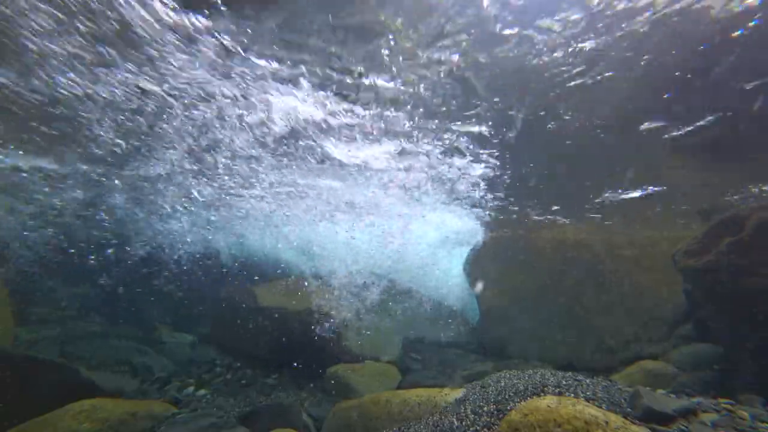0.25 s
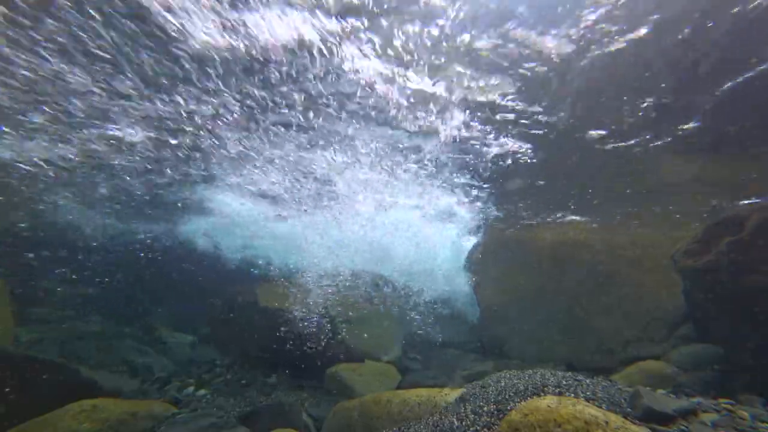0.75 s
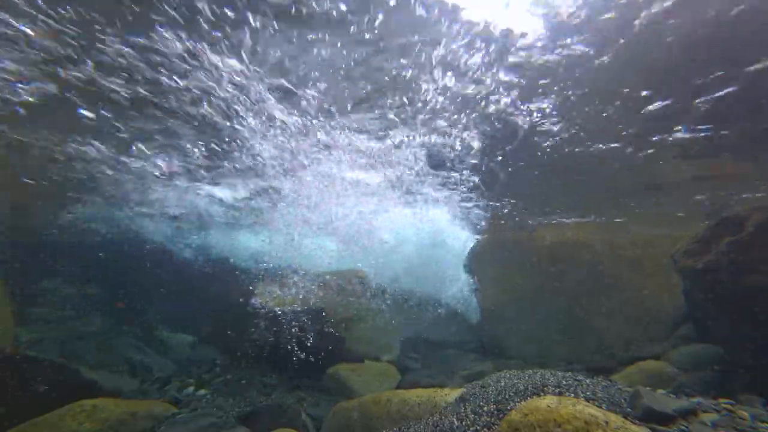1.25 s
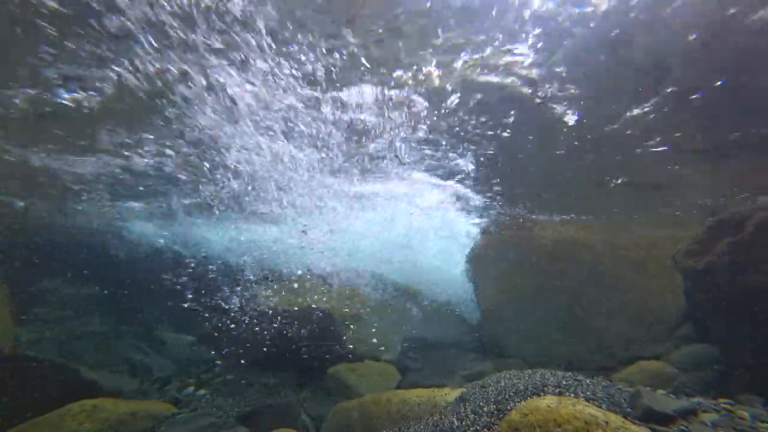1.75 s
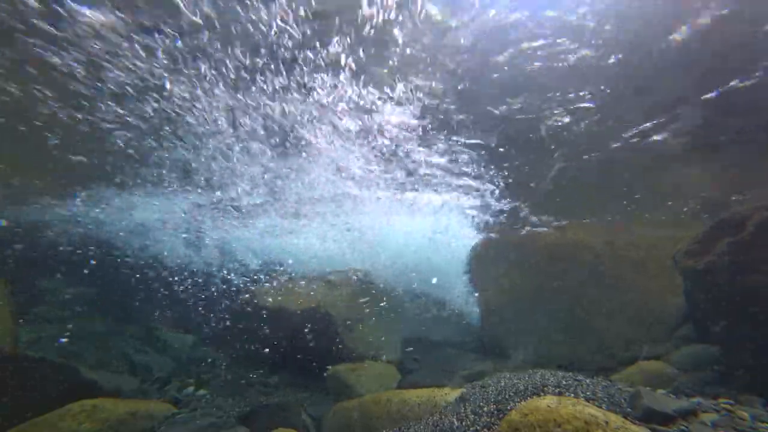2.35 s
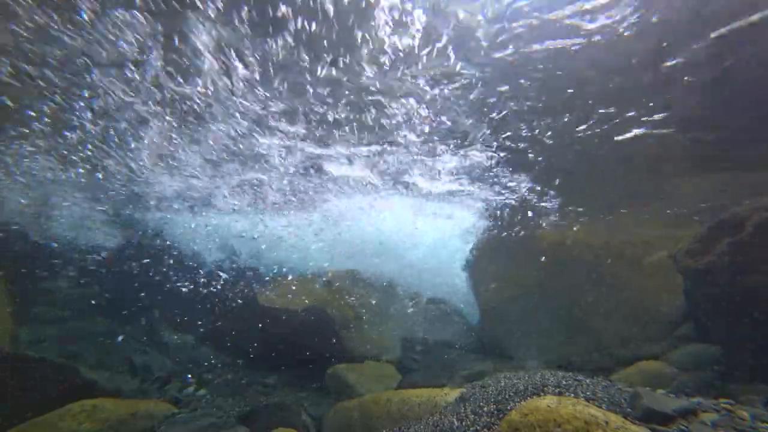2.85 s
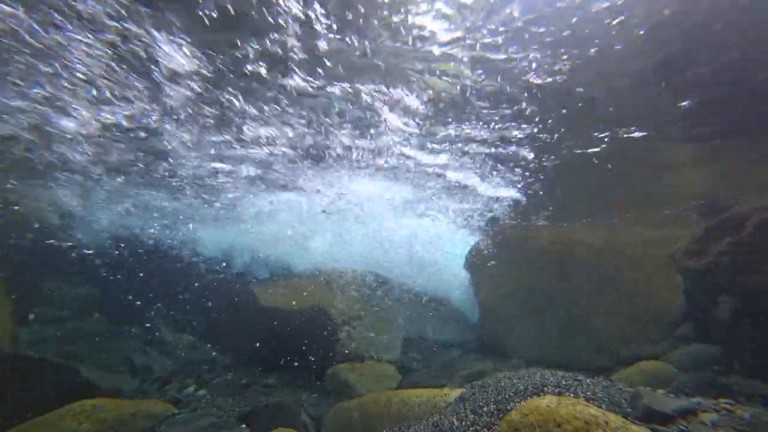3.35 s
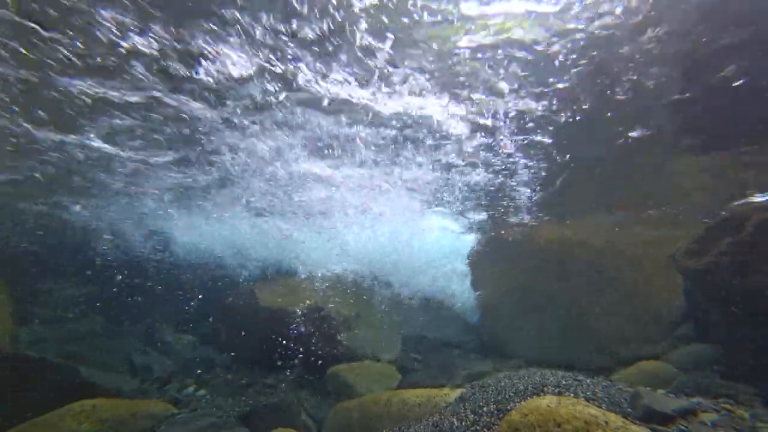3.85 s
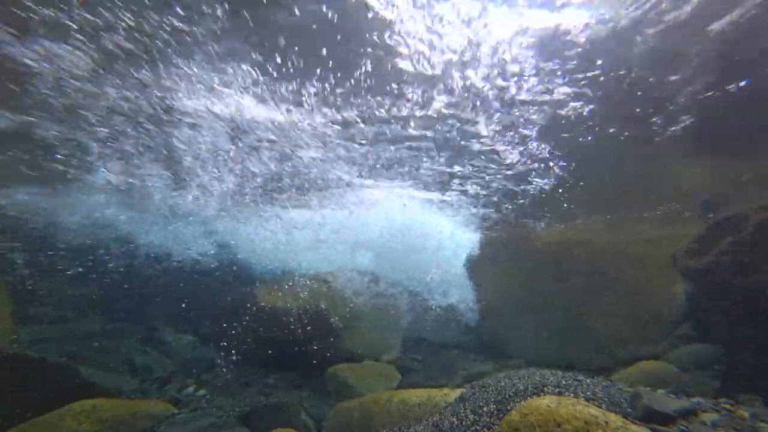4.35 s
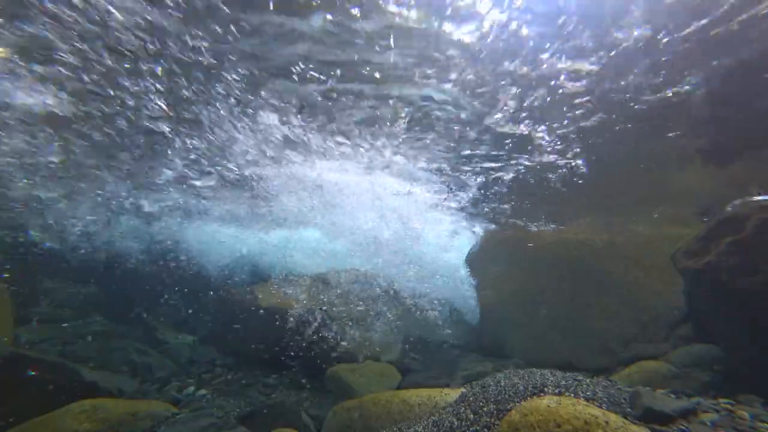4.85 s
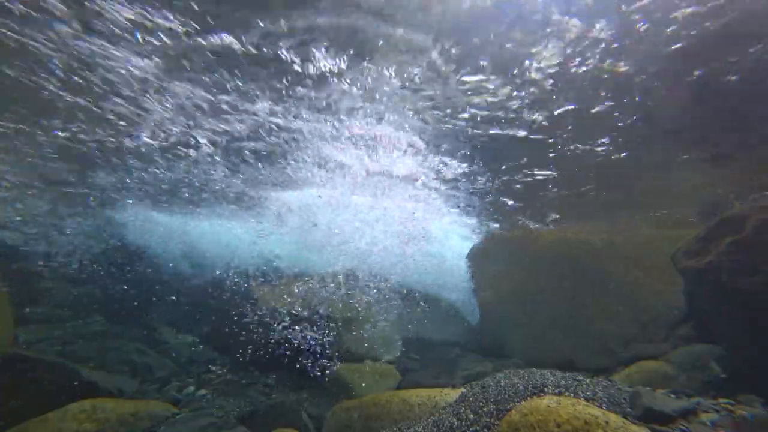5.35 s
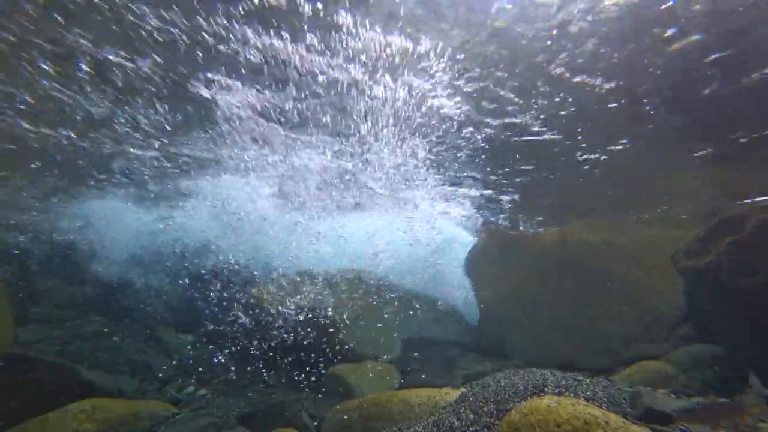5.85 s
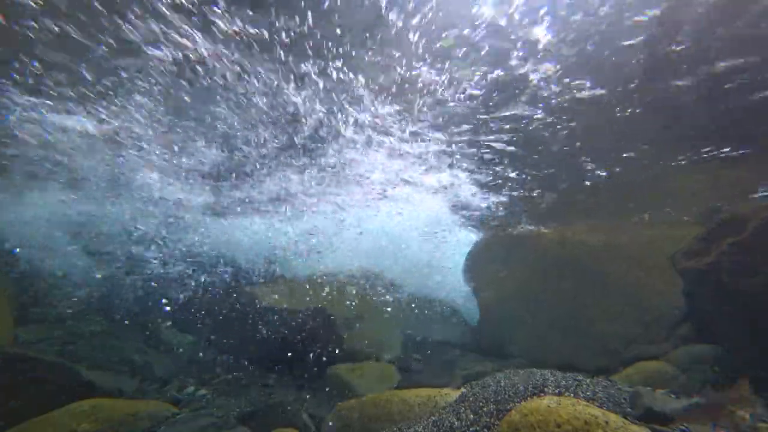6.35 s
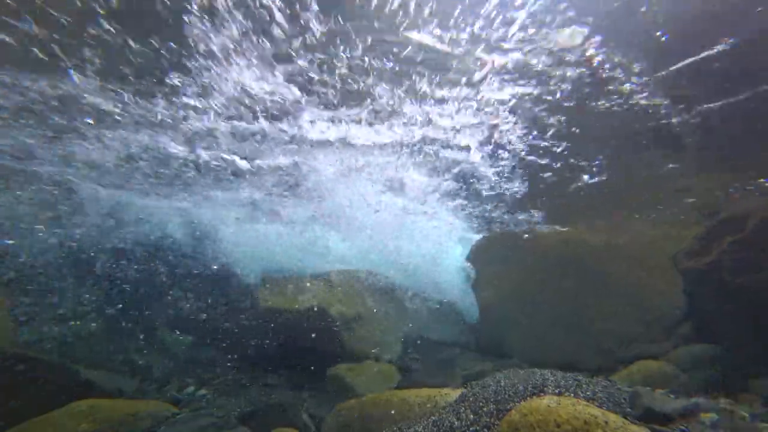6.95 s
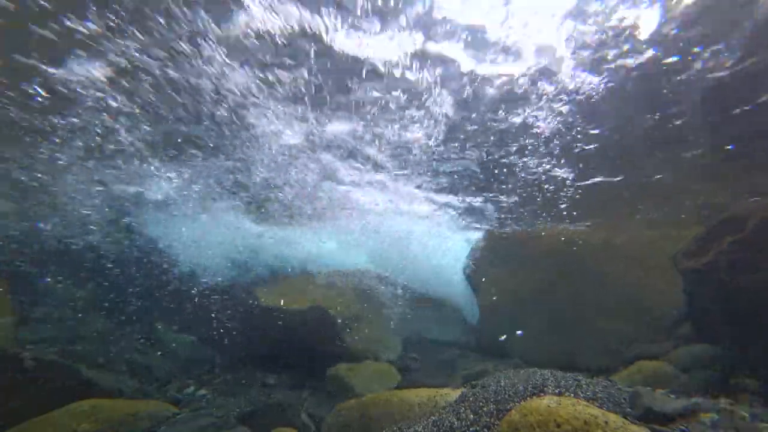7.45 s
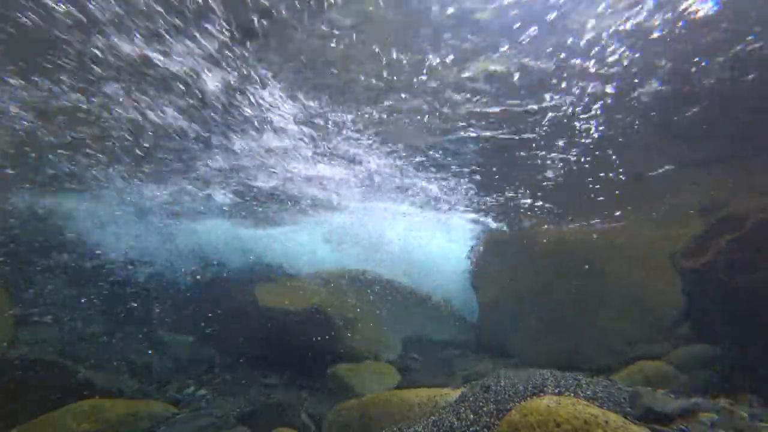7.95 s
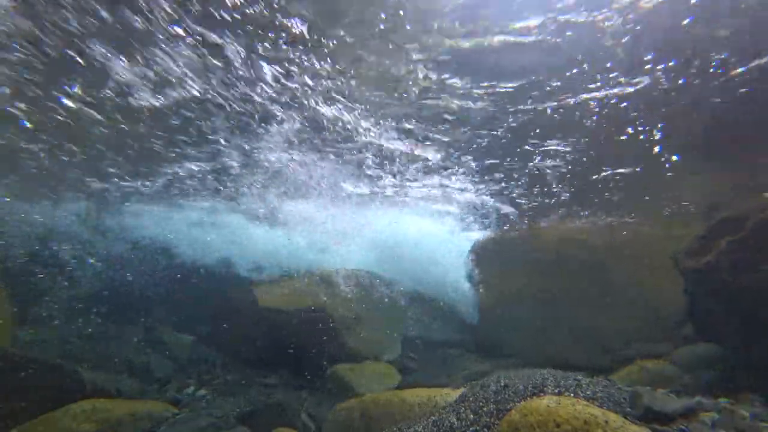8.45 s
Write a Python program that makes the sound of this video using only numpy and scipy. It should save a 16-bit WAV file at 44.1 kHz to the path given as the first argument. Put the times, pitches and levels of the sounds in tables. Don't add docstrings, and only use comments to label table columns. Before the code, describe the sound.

Muffled underwater river churn with a steady hollow wash, fine fizzing bubbles, irregular bloops and pops, and two strong plops near the end.

```python
import sys
import numpy as np
from scipy import signal
from scipy.fft import rfft, irfft, next_fast_len
from scipy.io import wavfile

SR = 44100
rng = np.random.default_rng(int(sys.argv[2]) if len(sys.argv) > 2 else 0)


def makeup_ratio(level_db):
    decades = np.asarray(level_db, float) / 20
    return 10 ** decades


def generate_wav(signal):
    frames = np.transpose(np.atleast_2d(signal))
    scaled = np.clip(frames, -1, 1) * 32767
    pcm = np.round(scaled).astype(np.int16)
    wavfile.write(sys.argv[1], SR, pcm)


N = 384552

# time_s, churn_db
PLUME_CHURN = [(0.0, -52), (0.63, -51.5), (0.7, -50), (0.92, -53), (1.24, -52), (1.8, -55.5), (2.45, -56.5),
               (2.55, -51.5), (2.77, -54), (3.54, -54), (3.81, -52.5), (6.02, -57), (7.04, -54.5),
               (7.21, -49), (7.3, -54.5), (8.43, -53.5), (8.5, -48.5), (8.72, -53.5)]
# pitch_hz, width_hz, left_db, right_db, right_lead_rad, side_spread_rad
WALL_MODES = [(324, 93, -15.5, -13.5, 1.85, 1.57), (468, 32, -11, -8, 5.5, 1.54),
              (561, 37, -6.5, -15, 1.9, 1.4), (665, 14, 6.5, 4.5, 2.43, 0.065),
              (735, 61, 4, -1.5, 2.85, 0.51), (853, 112, -10, -2, 2.58, 1.03),
              (1030, 132, -5.5, -7.5, 1.68, 3.71), (1122, 57, -5, -6, 3.93, 0.13),
              (1695, 346, -10, -12.5, 1.68, 0.39), (1880, 166, -10.5, -25.5, 2.5, 2.8),
              (2250, 58, -34, -12, 1.7, 1.3), (3060, 170, -18, -16, 1.4, 1.2),
              (3620, 127, -16, -21, 0.27, 1), (4930, 1390, -19, -25.5, 0.16, 1.3),
              (6380, 2120, -48.5, -17.5, 0.11, 1.15), (6700, 61, -47, -48, 2.7, 1.1)]
# pitch_hz, level_db (per Hz)
FLOOR_COLOUR = [(20, -21), (50, -13.5), (92, -6), (150, -9.5), (300, -6.5), (2000, 0.5), (8500, -12),
                (10500, -5), (13000, -6.5), (16000, -9)]
# pitch_hz, likeness (0 to 1)
FLOOR_LIKENESS = [(60, 0.93), (95, 0.97), (160, 0.043), (6000, 0.62), (8600, 0.83), (10500, 0.13),
                  (12500, 0.58), (15000, 0.89)]
# pitch_hz, level_db (rms)
CIRCUIT_WHINES = [(6000.5, -86), (8421.5, -89), (12000, -91)]
# pitch_hz, balance_db (plus is left)
NEAR_BALANCE = [(450, 3.5), (750, 8.5), (1100, 4), (2200, 7), (3300, -2), (5500, 6), (7200, -3.5)]
# start_s, level_db (peak), pitch_hz, cycles_to_peak, balance_db
PLOPS = [(0.016, -36.5, 1030, 5.1, -1), (0.068, -41, 1005, 6.5, 3), (0.166, -37, 1174, 8.8, 5),
         (0.224, -36.5, 948, 5, 15), (0.28, -40, 1090, 4.5, 2), (0.393, -44, 1240, 4.7, 2.5),
         (0.456, -36, 828, 4.9, 22), (0.807, -37, 1030, 5.7, 10), (1.114, -39, 946, 6.5, 9),
         (1.972, -43, 1142, 13.4, 11), (2.176, -35.5, 1132, 6.3, 5), (2.31, -41, 1140, 3.6, 1),
         (2.355, -34.5, 1134, 2.46, 0), (2.549, -33.5, 683, 5.9, 5), (2.772, -39, 665, 8.8, 8),
         (2.817, -35.5, 668, 10, 8), (3.573, -37.5, 757, 9, 6), (3.979, -35, 714, 7.5, 7),
         (4.556, -38.5, 1050, 3.9, 2), (5.534, -33.5, 870, 5.3, 0), (7.043, -32, 720, 6.5, 6),
         (7.1965, -21.5, 735, 3.73, 11), (8.4835, -15.5, 856, 3.62, 25), (8.612, -39, 796, 6.6, 14)]
# start_s, level_db (peak), pitch_hz, cycles_to_peak, balance_db
SPLITS = [(.014, -38, 816, 3.9, 10), (1.121, -43, 674, 4.9, 1), (1.136, -41.5, 680, 3.5, 6),
          (1.15, -46, 660, 5.4, 4), (2.585, -39.5, 656, 3.9, 7), (3.985, -41.5, 1083, 11.3, 4),
          (3.565, -37.5, 820, 3.5, 9), (5.547, -41.5, 893, 8.7, 0), (5.561, -49, 651, 10.7, 7),
          (7.062, -41.5, 724, 8, 3), (7.207, -32, 740, 2.8, -5), (7.217, -39, 686, 4.54, 7),
          (7.24, -39, 670, 6.5, -1), (7.253, -36, 725, 4.3, 7), (7.272, -43, 720, 5, 1),
          (8.494, -22.5, 830, 2.3, 9), (8.4882, -23.5, 935, 5.1, 8), (8.498, -31.5, 1177, 7.4, 1),
          (8.51, -42, 1190, 9, -7), (8.555, -37.5, 790, 4.8, 17), (8.571, -43, 785, 5.1, 5)]
# start_s, level_db (peak), pitch_hz
GULPS = [(0.05, -67, 467), (0.356, -53, 454), (0.569, -61, 460), (0.715, -53, 474), (0.959, -46, 477),
         (0.978, -49.5, 486), (1.018, -46.5, 430), (1.06, -52, 460), (1.119, -47.5, 460),
         (2.524, -56.5, 464), (3.26, -60.5, 423), (3.832, -56, 477), (4.258, -51, 544), (7.193, -44, 464),
         (7.81, -58, 352), (6.82, -59.5, 545), (8.492, -54, 480), (8.611, -55, 450)]
# start_s, level_db (peak), pitch_hz
GLUGS = [(0.309, -46, 830), (0.709, -42, 815), (0.729, -42.5, 757), (0.883, -44.5, 1096),
         (1.005, -43.5, 785), (1.229, -47, 780), (1.358, -47.5, 686), (1.383, -46.5, 737),
         (1.447, -47.5, 707), (1.626, -51, 1030), (2.525, -42, 770), (2.612, -45, 566), (2.727, -50, 646),
         (2.879, -45.5, 677), (3.005, -45.5, 666), (3.04, -45.5, 1010), (8.03, -44, 853), (3.637, -55, 735),
         (3.827, -46, 862), (3.933, -44, 793), (3.956, -42.5, 736), (4.645, -47.5, 670), (4.75, -47.5, 710),
         (5.401, -46.5, 665), (5.72, -49, 735), (6.365, -45.5, 1047), (7.723, -43.5, 1070),
         (8.014, -44, 858), (8.302, -44, 1030), (8.339, -42, 970)]
# start_s, level_db (peak), pitch_hz
STRAYS = [(0.555, -47, 2400), (0.572, -44.5, 1680), (0.586, -42, 1950), (.592, -52, 1400),
          (.642, -43.5, 1660), (1.064, -46, 2250), (2.355, -46, 2250), (2.355, -41.5, 4080),
          (3.132, -46.5, 2280), (8.424, -43.5, 2550), (8.432, -44, 1690), (8.437, -39, 5250),
          (8.451, -36.5, 6480), (8.613, -45, 2450), (1.274, -50, 4330), (2.305, -53, 1895),
          (2.626, -49.5, 3720), (6.345, -51.5, 696), (5.199, -48.5, 3050), (5.32, -52, 1110),
          (5.684, -52, 1080), (5.827, -50, 3620), (5.94, -53, 2800), (6.245, -52, 717),
          (6.914, -47.5, 3480), (7.119, -48.5, 4840), (7.246, -47, 4930), (7.305, -48.5, 1027),
          (7.933, -49, 3000), (8.508, -47, 885)]
# start_s, level_db (peak), pitch_hz, cycles_to_peak
POPS = [(0.0667, -45.5, 2250, 6.4), (0.164, -43, 1670, 4.6), (0.269, -47, 1750, 6.1),
        (0.3076, -45, 1880, 5.8), (0.3995, -39.5, 1770, 5.6), (0.4269, -47, 1535, 10),
        (0.4673, -47.5, 1700, 4.1), (0.6295, -51, 1710, 8.1), (0.734, -47.5, 1880, 9.3),
        (0.9888, -51, 1860, 1.6), (1.1174, -46.5, 1900, 6.3), (1.2487, -41.5, 1880, 4.5),
        (1.3936, -45.5, 2360, 5.1), (1.4459, -43, 1970, 5.3), (2.173, -53, 1690, 10),
        (2.3545, -38, 1880, 3.1), (2.471, -40.5, 1840, 5), (2.5225, -52, 1630, 7.1),
        (2.881, -34, 1924, 7.6), (3.1313, -43.5, 1906, 4.2), (3.9379, -47.5, 1730, 3.6),
        (4.774, -44.5, 1960, 4.7), (6.7338, -40.5, 1744, 8.4), (7.162, -46.5, 1800, 6.3),
        (8.4213, -42.5, 1570, 7.8), (8.4921, -46, 1480, 4.9), (8.518, -46, 1860, 5.2),
        (8.555, -34.5, 1675, 4.7), (8.6125, -43, 1750, 3.8), (8.6527, -52, 1870, 5.5)]
# start_s, level_db (peak), pitch_hz
TICKS = [(0.132, -46, 6140), (0.2044, -31, 7240), (0.2618, -41.5, 7140), (0.312, -45.5, 3320),
         (0.5538, -35.5, 7460), (0.6309, -37, 3440), (0.968, -30.5, 7020), (1.1073, -44, 5900),
         (1.5986, -43, 7000), (2.178, -51, 3100), (2.1745, -36, 5600), (2.355, -36.5, 3400),
         (2.5045, -45, 5590), (2.9977, -32, 7200), (3.1318, -39.5, 6950), (3.484, -31.5, 6870),
         (3.681, -42, 5130), (3.8383, -40.5, 5760), (4.7116, -40.5, 5460), (4.825, -43, 7240),
         (5.2993, -46, 5500), (7.5418, -45.5, 6140), (7.6127, -42, 3250), (7.7217, -43.5, 3240),
         (7.969, -42, 6540), (8.1417, -39.5, 7240), (8.1875, -42.5, 5900), (8.2207, -41, 7360),
         (8.256, -43, 6500), (8.4312, -29.5, 7300)]
# start_s, level_db (peak), pitch_hz
LARGE = [(0.02, -54, 470), (0.165, -44.5, 773), (0.354, -49, 1054), (3.045, -51, 689), (0.233, -41, 970),
         (0.406, -41.5, 1180), (7.159, -50, 1070), (0.744, -45, 820), (1.243, -46, 720),
         (1.266, -48.5, 820), (7.287, -44, 750), (1.593, -51, 846), (1.658, -47, 1030), (2.738, -53, 660),
         (2.767, -55, 1090), (2.881, -50, 1080), (0.817, -43, 1080), (3.687, -50, 720), (3.19, -48.5, 660),
         (3.359, -48, 686), (3.463, -50.5, 682), (3.501, -52, 720), (3.657, -47, 747), (3.783, -52, 880),
         (5.415, -48, 680), (0.618, -48, 680), (4.194, -49.5, 855), (4.428, -52, 1030), (4.434, -48.5, 870),
         (4.453, -49, 1110), (3.44, -51, 700), (4.646, -51, 895), (7.298, -47, 686), (4.749, -48, 976),
         (5.484, -54, 703), (7.012, -49, 770), (7.575, -48.5, 723), (7.607, -50, 1160), (7.613, -52, 665),
         (7.808, -52, 1080), (8.597, -49, 785), (4.003, -44, 720), (8.221, -49.5, 682), (8.574, -42, 970),
         (7.805, -51, 747), (8.649, -51, 855), (8.656, -49, 1030), (8.714, -54, 800)]
# start_s, level_db (peak), pitch_hz
MEDIUM = [(0.044, -52, 2970), (0.225, -51, 3640), (0.263, -52, 3360), (0.299, -52, 3060),
          (0.399, -49, 2310), (0.516, -53, 1460), (0.558, -48, 1510), (0.566, -47, 3550),
          (0.699, -51, 1810), (0.726, -52, 2430), (1.446, -47, 2283), (3.292, -55, 1900),
          (0.947, -53, 3190), (0.947, -52, 1520), (0.958, -53, 1700), (0.989, -51, 2430),
          (1.049, -49, 1850), (1.068, -53, 3060), (1.176, -52.5, 3120), (1.222, -51, 3800),
          (1.393, -53, 1730), (0.079, -49, 2024), (1.522, -54, 3010), (1.623, -52, 1520),
          (2.167, -53, 3970), (2.172, -48, 3150), (0.358, -53, 1809), (8.421, -48, 1950),
          (2.767, -49.5, 1800), (8.139, -57, 1840), (3.373, -52, 3060), (3.513, -52.5, 1790),
          (3.846, -51.5, 1910), (3.885, -52, 3750), (3.992, -53, 1700), (4.013, -48.5, 1720),
          (4.07, -53, 2860), (4.254, -51, 3020), (4.683, -54, 1940), (4.781, -49.5, 3440),
          (5.38, -51, 1950), (7.206, -50, 1600), (7.232, -51, 1680), (7.871, -49, 1500), (8.071, -53, 3600),
          (8.119, -50.5, 2820), (8.301, -52, 1800), (8.451, -46, 1530)]
# start_s, level_db (peak), pitch_hz
TINY = [(0.016, -51, 5070), (0.481, -48, 6800), (0.104, -51, 5260), (0.152, -48, 5800), (0.159, -52, 5100),
        (0.168, -52, 5060), (0.217, -47, 5400), (0.218, -45, 7320), (0.27, -45, 7080), (2.997, -48, 8140),
        (0.341, -50, 6500), (0.567, -51, 5040), (0.646, -53, 5600), (0.671, -49, 7100), (0.695, -52, 5260),
        (0.795, -50, 5000), (1.006, -50, 5730), (1.034, -51, 7800), (1.108, -51, 7110), (1.314, -51, 6800),
        (1.549, -52, 5680), (2.102, -51, 5920), (2.167, -49, 5080), (2.296, -50, 5880), (2.519, -50, 7400),
        (2.529, -50, 4820), (2.591, -54, 5580), (2.667, -48, 5660), (2.967, -51, 7150), (2.997, -49, 5770),
        (3.138, -51, 5210), (3.17, -50, 8350), (3.318, -50, 6700), (3.384, -51, 6200), (3.781, -50.5, 5190),
        (3.994, -50, 6960), (8.257, -50, 5730), (5.311, -51, 5350), (5.804, -52, 6680), (6.191, -51, 7820),
        (7.105, -49, 6610), (3.203, -52, 5600), (7.236, -52, 6160), (7.522, -51, 7110), (7.837, -50, 7920),
        (8.01, -47.5, 5680), (8.391, -51, 5800), (8.398, -48, 6830), (8.533, -49, 7430), (8.55, -49, 7900)]
# start_s, level_db (peak), pitch_hz
SCATTERED = [(.279, -45, 834), (.425, -52, 1740), (.902, -49, 1060), (1.299, -49, 1820), (2.358, -40, 3150),
             (2.494, -55, 980), (2.522, -49, 1490), (2.963, -60, 960), (3.734, -54.5, 547),
             (4.021, -47, 715), (5.59, -56, 670), (5.104, -53, 870), (0.466, -43.5, 825),
             (7.724, -48, 1240), (8.01, -50.5, 676), (8.429, -45, 1950), (8.612, -40, 1120)]
# start_s, level_db (peak), contact_ms
SNAPS = [(0.28, -46, 0.14), (.552, -48, 0.067), (0.629, -45, 0.065), (0.7198, -46.5, 0.35),
         (1.118, -48, 0.13), (1.4446, -47, 0.16), (2.1749, -38.5, 0.059), (2.3545, -40.5, 0.074),
         (2.523, -45.5, 0.11), (3.132, -42, 0.12), (7.194, -51, 0.61), (8.4205, -45.5, 0.097),
         (8.431, -44, .05), (8.436, -46, 0.053), (8.446, -44, 0.045), (8.6117, -47.5, 0.22)]


def rms_one(x):
    return x / np.sqrt(np.mean(np.abs(x) ** 2) + 1e-20)


def at_hz(points, hz):
    table_hz, values = np.transpose(points)
    return np.interp(np.log(hz + 1), np.log(table_hz), values)


def drift(rate_hz):
    r = np.exp(-2 * np.pi * rate_hz * 40 / SR)
    noise = rng.standard_normal(N // 40 + 2002)
    slow = signal.lfilter([1], [1, -2 * r, r * r], noise)[2000:]
    return np.interp(np.arange(N) / 40, np.arange(len(slow)), rms_one(slow))


def ring(clicks, hz, width_hz):
    r, w = np.exp(-np.pi * width_hz / SR), 2 * np.pi * hz / SR
    return signal.lfilter([0, np.sin(w)], [1, -2 * r * np.cos(w), r * r], clicks + 1e-18)


def surges():
    churn_db = np.interp(np.arange(N) / SR, *np.transpose(PLUME_CHURN))
    swing_db = churn_db + 54
    bright_db = -59.5 + 0.47 * swing_db
    gulping = makeup_ratio(-74.5 + 2.74 * swing_db)
    age_s = np.arange(SR // 2) / SR
    rise_s, fall_s, wake_db = 0.0086, 0.018, 1
    wake = (1 - np.exp(-age_s / rise_s)) * np.exp(-age_s / fall_s)
    for start_s, peak_db, _ in GULPS:
        stirred = gulping[round(start_s * SR):][:len(age_s)]
        stirred[:] = np.maximum(stirred, makeup_ratio(peak_db + wake_db) * wake[:len(stirred)])
    return churn_db, bright_db, 20 * np.log10(gulping)


def swarm(per_s, size_spread_db, cycles, low_hz, high_hz, count):
    loudness = makeup_ratio(size_spread_db * np.minimum(rng.exponential(1, N), 3))
    sizes = loudness * rng.choice([-1, 1], N)
    born = rng.random(N) < per_s * makeup_ratio(4 * drift(5)) / SR
    dealt = rng.integers(0, count, N)
    total = 0
    for k, hz in enumerate(np.geomspace(low_hz, high_hz, count)):
        total = total + ring(sizes * born * (dealt == k), hz, hz / cycles) * (hz / 1000) ** 0.6
    return rms_one(total)


def plume():
    deep_db, bright_db, gulp_db = surges()
    lively = makeup_ratio(0.63 * (deep_db + 51.5))
    small = swarm(per_s=300, size_spread_db=1.8, cycles=16.0, low_hz=330, high_hz=2600, count=14)
    fizz = swarm(per_s=90, size_spread_db=3.4, cycles=11.0, low_hz=2900, high_hz=7800, count=8)
    wash = makeup_ratio(7) * rng.standard_normal(N)
    water = wash + lively * (makeup_ratio(1.0) * small + makeup_ratio(-0.5) * fizz)
    parts = [(gulp_db + 14.5, [290, 510]), (deep_db + 6.0, [595, 1350]), (bright_db + 11.0, [1450, 12000])]
    total = 0
    for level_db, edges_hz in parts:
        band = signal.sosfilt(signal.butter(4, edges_hz, "band", fs=SR, output="sos"), water)
        total = total + makeup_ratio(level_db + 1.3 * drift(15.3)) * band
    return total


def mode(hz, centre_hz, width_hz, phase):
    near, mirror = [1 / (1 + 2j * (hz - f) / width_hz) for f in (centre_hz, -centre_hz)]
    return np.exp(1j * phase) * near + np.exp(-1j * phase) * mirror


def housing(upstream, downstream, knocks):
    size = next_fast_len(N + SR // 4)
    hz = np.arange(size // 2 + 1) * SR / size
    up, down, knock = rfft([upstream, downstream, knocks], size)
    left, right = 0, 0
    for centre_hz, width_hz, left_db, right_db, lead, spread in WALL_MODES:
        left = left + makeup_ratio(left_db) * mode(hz, centre_hz, width_hz, 0) * (up + down + knock)
        paths = [mode(hz, centre_hz, width_hz, lead + turn) for turn in (spread, -spread, -0.55)]
        right = right + makeup_ratio(right_db) * (paths[0] * up + paths[1] * down + paths[2] * knock)
    return irfft([left, right], size)[:, :N]


def floor():
    size = next_fast_len(N)
    hz = np.arange(size // 2 + 1) * SR / size
    mid, side = rfft(rng.standard_normal((2, size)))
    alike = np.clip(at_hz(FLOOR_LIKENESS, hz), 0, 1)
    pair = np.sqrt(1 + alike) * mid + np.sqrt(1 - alike) * side * [[1], [-1]]
    pair = pair * makeup_ratio(at_hz(FLOOR_COLOUR, hz))
    rumble, hiss = [irfft(pair * part, size)[:, :N] for part in (hz < 220, hz >= 220)]
    gulp_db = surges()[2]
    swell = makeup_ratio(0.27 * (np.minimum(gulp_db, -66) + 66.0))
    noise = makeup_ratio(-60.5) * rms_one(rumble * swell + hiss * makeup_ratio([[-0.6], [0.6]]))
    t = np.arange(N) / SR
    return noise + sum(np.sqrt(2) * makeup_ratio(db) * np.sin(2 * np.pi * f * t) for f, db in CIRCUIT_WHINES)


def bubbles(rows, rise, soft):
    out, walls = np.zeros((3, N + SR)), np.array(WALL_MODES)
    phases = rng.uniform(0, 2 * np.pi, len(rows))
    for (start_s, peak_db, hz, cycles, *side_db), phase in zip(rows, phases):
        swell_cycles = max(cycles, 0.5)
        turns = np.arange(int(9 * swell_cycles * SR / hz)) * hz / SR
        age = turns / swell_cycles
        swell = (age * np.exp(1 - age)) ** soft
        tone = makeup_ratio(peak_db) * swell * np.exp(1j * (2 * np.pi * turns * (1 + rise * (age - 2)) + phase))
        pan_db = side_db[0] if side_db else at_hz(NEAR_BALANCE, hz)
        lead = min(np.interp(hz, walls[:, 0], walls[:, 4]), 1.75)
        turned = np.exp(1j * lead)
        left_gain, right_gain = makeup_ratio(pan_db / 2), makeup_ratio(-pan_db / 2)
        even = 2 / abs(left_gain + right_gain * turned)
        first = round((start_s - 0.1717 * soft * cycles / hz) * SR)
        i, tone = max(first, 0), tone[max(-first, 0):]
        left, right = even * left_gain * tone, even * right_gain * tone * turned
        out[:, i:i + len(tone)] += [left.real, right.real, tone.real]
    return out[:, :N]


def snaps():
    out, t = np.zeros(N + SR), np.arange(-60, 60) / SR
    fade = np.exp(-np.arange(300) / SR / 0.0016)
    for start_s, peak_db, contact_ms in SNAPS:
        push = t / (max(contact_ms, 0.02) / 1000)
        rattle = np.convolve(rng.standard_normal(300) * fade, push * np.exp(-push ** 2))
        place = out[round(start_s * SR) - 60:][:len(rattle)]
        place += makeup_ratio(peak_db + 23.5) * rattle / np.abs(rattle).max()
    return out[:N]


def scene():
    def with_shape(rows, *shape):
        return [(*row, *shape) for row in rows]

    upstream, downstream = plume(), plume()
    big = bubbles(PLOPS + SPLITS, rise=0.004, soft=3.0) * makeup_ratio([[0.5], [0.5], [-4.5]])
    gentle = with_shape(GULPS, 6.13) + with_shape(GLUGS, 5.8, 13) + with_shape(STRAYS, 7.87)
    near = big + bubbles(gentle, rise=0.004, soft=3.0)
    near = near + bubbles(POPS, rise=0.00038, soft=1.27)
    near = near + bubbles(with_shape(TICKS, 2.42), rise=0.00084, soft=0.77)
    standouts = with_shape(LARGE + SCATTERED, 5.47) + with_shape(MEDIUM, 7.1) + with_shape(TINY, 5)
    near = near + bubbles(standouts, rise=0.00081, soft=1.826)
    inside = near[:2] + housing(upstream, downstream, makeup_ratio(-0.5) * near[2] + snaps())
    stiff = signal.butter(6, 260, "high", fs=SR, output="sos")
    return signal.sosfilt(stiff, inside) + floor()


def band_limit(x):
    return signal.sosfilt(signal.butter(12, 15770, fs=SR, output="sos"), x)


def record(dry):
    top_cut = signal.cheby2(16, 70, 16350, fs=SR, output="sos")
    mix = signal.sosfilt(top_cut, dry)
    return band_limit(mix)


dry = scene()
out = record(dry)
generate_wav(out)
```